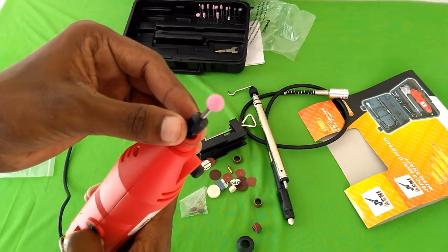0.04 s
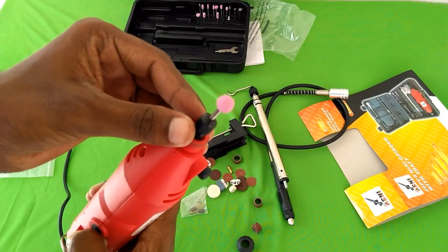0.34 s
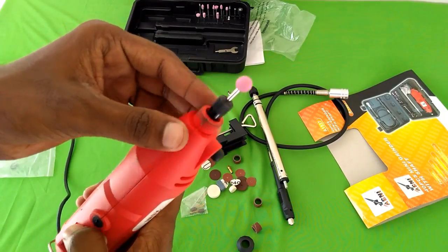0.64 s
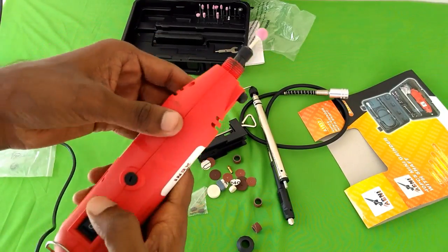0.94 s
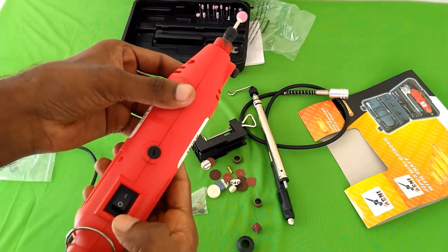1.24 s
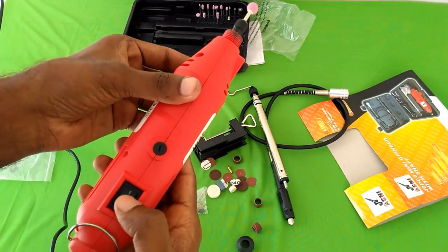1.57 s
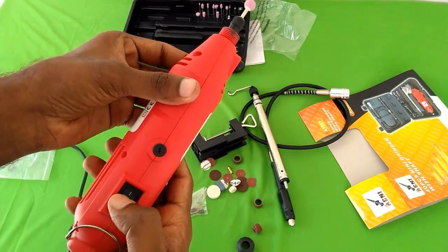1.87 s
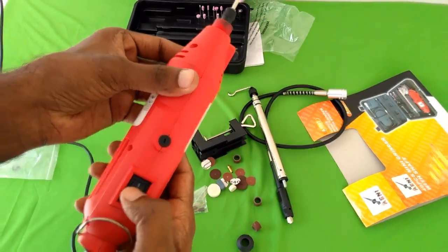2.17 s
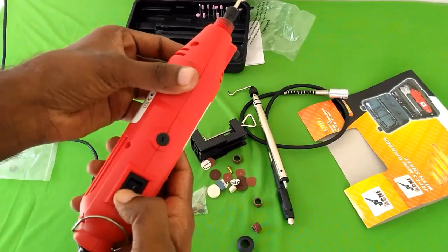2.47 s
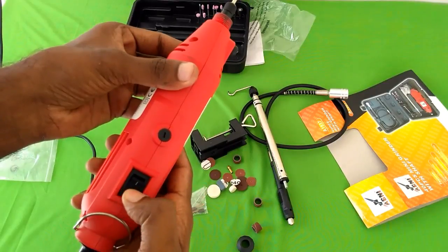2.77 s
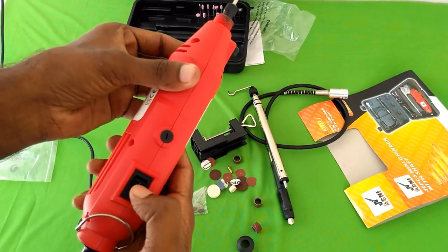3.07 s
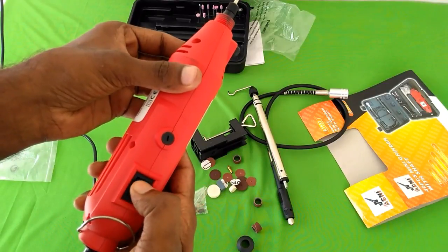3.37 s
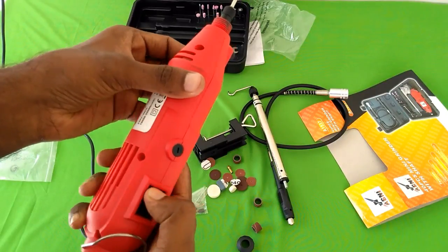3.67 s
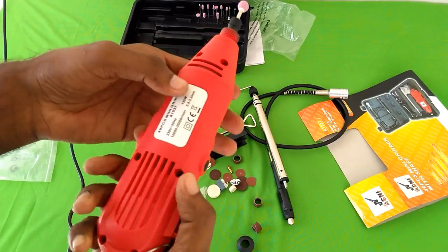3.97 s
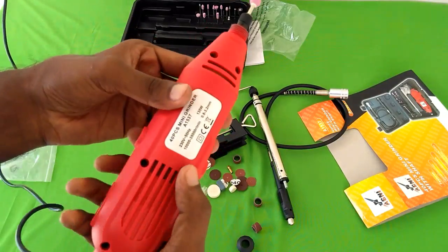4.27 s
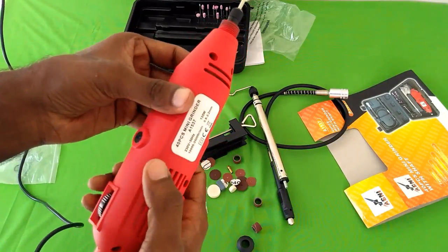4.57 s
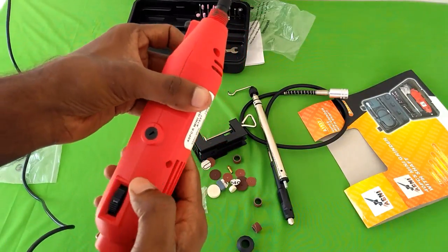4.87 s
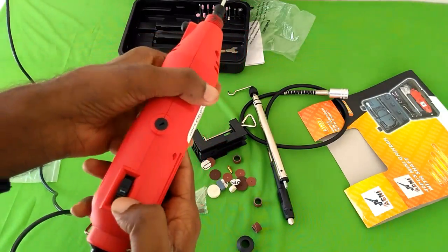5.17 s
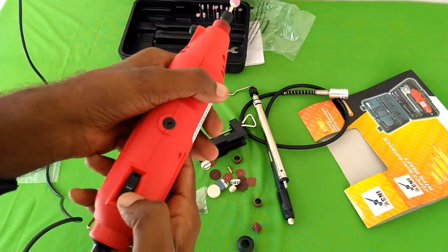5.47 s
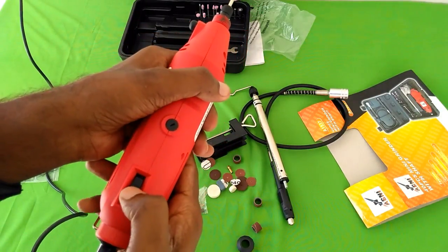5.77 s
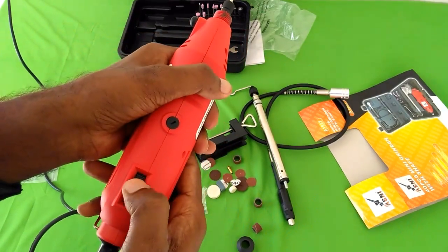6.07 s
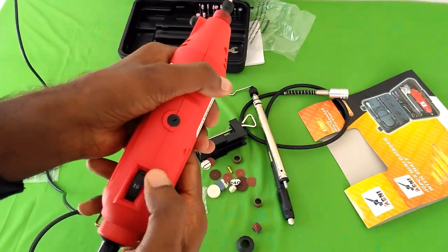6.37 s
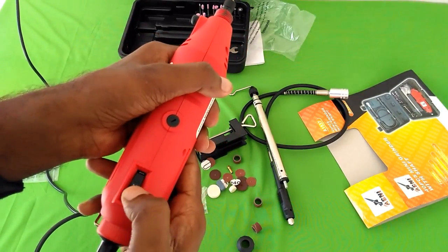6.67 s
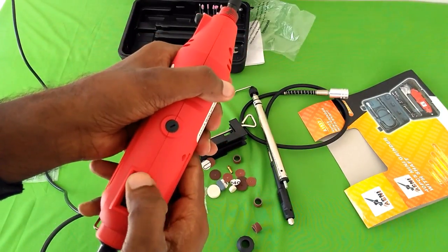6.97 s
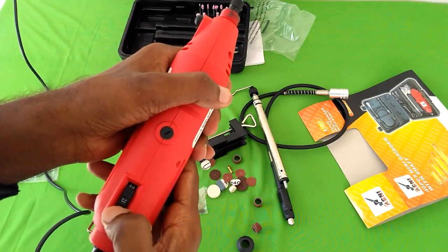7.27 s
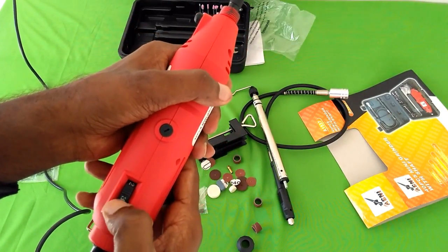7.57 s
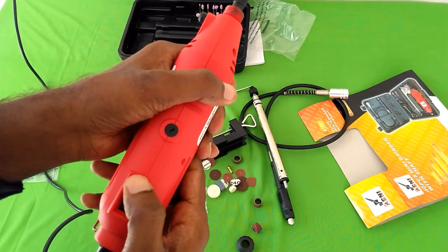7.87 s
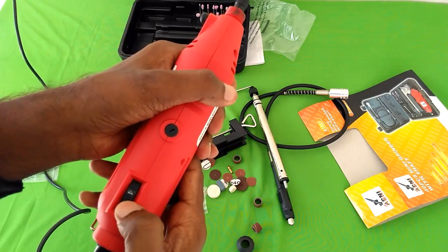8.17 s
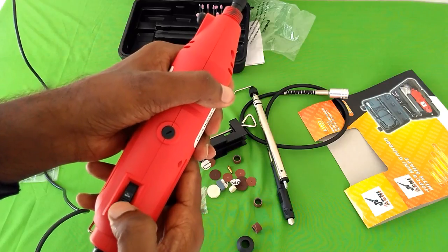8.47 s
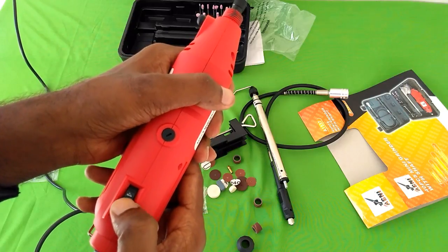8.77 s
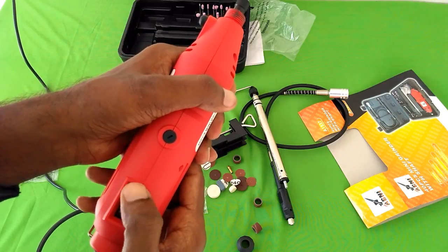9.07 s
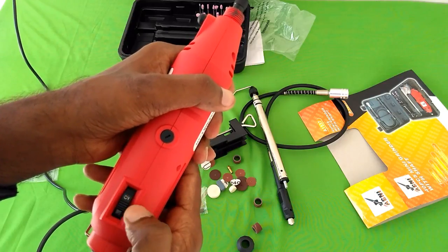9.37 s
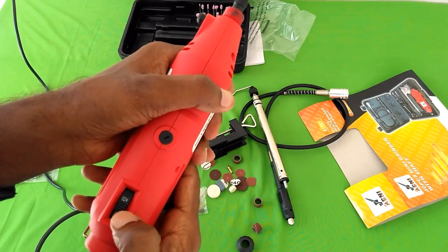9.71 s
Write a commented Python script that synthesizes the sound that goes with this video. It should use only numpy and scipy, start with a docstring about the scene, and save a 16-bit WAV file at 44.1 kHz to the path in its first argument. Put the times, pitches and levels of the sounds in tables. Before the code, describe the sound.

Running freely indoors, a handheld electric grinder buzzes, is switched off briefly, then starts again and speeds up to a shrill whine.

```python
"""A small mains rotary grinder runs unloaded in the hand, near a two-port microphone in a room.
The rotor sings on its orders, chopped mains makes the slots buzz, brushes rub and hiss, the fan rushes.
At 2.4 s the rocker snaps off and the rotor coasts to rest, rattling faintly.
At 3.5 s a thumb squeaks on the rocker and the motor restarts; at 4.1 s the grip changes.
From 6.2 s the dial is turned up in steps, to over 400 turns per second (rps)."""
import sys
import numpy as np
from scipy import signal
from scipy.fft import rfft, irfft, next_fast_len
from scipy.io import wavfile
from scipy.ndimage import uniform_filter1d

SR = 44100
rng = np.random.default_rng(int(sys.argv[2]) if len(sys.argv) > 2 else 0)


def materialize(psi):
    """Save the field psi as 16-bit PCM at rate SR to the path in sys.argv[1].

    A 1-D psi becomes a single channel; in a 2-D psi each row is a channel.
    """
    bounded = np.clip(np.atleast_2d(psi).T, -1, 1)
    quanta = np.round(bounded * 32767).astype(np.int16)
    wavfile.write(sys.argv[1], SR, quanta)


N = 429534
TIME = np.arange(N) / SR
FFT_SIZE = next_fast_len(N + SR // 2)
BINS_HZ = np.maximum(np.fft.rfftfreq(FFT_SIZE, 1 / SR), 1)

OFF_S, ON_S = 2.415, 3.469
POWERED = (np.arange(N) < OFF_S * SR) | (np.arange(N) >= ON_S * SR)
HALF_WAVE_HZ = 99.96
MAINS_RIPPLE = np.cos(2 * np.pi * HALF_WAVE_HZ * (TIME - .0013))
SLOW_RPS, IDLE_RPS, FRICTION_FADE_RPS = 60, 160, 63
FACING_SHARE = .061  # part of the stator's facing level that rotor tones and growl follow

# Sides shown as the tool turns in the hand: t/s, rub/dB, hiss/dB, stator/dB
FACING = [(0, -1.5, 0.5, 6), (.6, -1.5, -2.5, 3), (.93, -7, -3, -23), (1.2, -1.5, -6, 6.5),
          (1.8, -2, -5, 8.5), (2.3, -3.5, -9.5, 8), (3.6, 8.5, 2, 8.5), (4.3, -1.5, 1.5, 8.5),
          (4.6, 0.5, 2, -5), (5.3, -7, 2.5, 8), (6.1, -4.5, 0, 10), (6.4, -4.5, -6, 12),
          (6.9, -3.5, -3.5, 13.5), (7.4, 0, -3, 11), (8.1, -2, -6.5, 2), (8.9, 2.5, -2, 1),
          (9.7, 5.5, -1, 9.5)]
# Brush rub spectrum: f/Hz, density/dB
RUB_SPECTRUM = [(1500, -2.5), (1680, -9), (1880, 9), (2200, -21), (2500, 9.5), (2900, 14), (3300, 4),
                (3950, 9.5), (4700, 7), (5600, 5.5), (6500, 3), (8000, -40)]
# Brush hiss spectrum: f/Hz, density/dB
HISS_SPECTRUM = [(5500, -16), (6800, -0.5), (7500, -0.5), (8600, 1.5), (10000, -0.5), (11800, -1),
                 (13200, -3), (14800, -5), (16000, -41)]


def rotor(rps, turns):
    """Imbalance (order 1), ball bearing (5.19) and slot (8) tones; they drop without current."""
    # Shaft speed steps: speed/rps
    steps_rps = [60, 160, 198, 255, 355, 420]
    # Rotor tones: order/(cycles per turn)
    orders = [1, 2, 3, 4, 5.19, 6, 8, 10, 11, 12]
    # Rotor tones, a row per order: level/dB at each speed step
    levels_db = [(-92.5, -64, -58, -49.5, -42, -34), (-102, -65, -54, -45.5, -47, -47),
                 (-73, -62.5, -54.5, -58, -45.5, -31.5), (-101, -61, -49.5, -50, -43, -34),
                 (-101, -48.5, -48.5, -40.5, -55, -42), (-99, -59, -34.5, -35.5, -28.5, -30),
                 (-100, -42, -44.5, -35, -50, -27.5), (-96.5, -53.5, -36.5, -33.5, -47, -45),
                 (-99, -54.5, -38, -54, -65, -43), (-99, -62.5, -48.5, -53, -67, -60)]
    _, _, stator_db = time_curves(FACING)
    drive = np.minimum(rps / SLOW_RPS, 1) ** 2 * from_db(np.where(POWERED, FACING_SHARE * stator_db, -26.5))
    gains = (from_db(np.interp(rps, steps_rps, row)) for row in levels_db)
    return drive * sum(g * tone(turns, k, waver_db=3.5, waver_hz=11) for k, g in zip(orders, gains))


def commutator(rps, turns, whine):
    """Uneven bars knock the brushes alike each turn: high orders, coloured by grip, speed and housing."""
    # Bar tones: order/(cycles per turn), first grip/dB, second grip/dB, high speed/dB
    bar_tones = [(14, -46, -40, -55), (16, -50, -38, -49), (17, -52.5, -55, -43), (18, -60.5, -56, -51),
                 (19, -42.5, -42.5, -56), (21, -53, -48, -39), (22, -46.5, -46, -41), (23, -65.5, -63, -54),
                 (24, -43.5, -53, -46), (25, -43, -60, -41), (26, -43.5, -43.5, -45), (27, -55, -53, -41),
                 (28, -42, -47, -43), (29, -46, -64, -44), (30, -51, -53, -50), (31, -42, -41, -49),
                 (32, -38, -47, -40), (33, -37, -41, -47), (34, -33, -40, -37), (35, -41, -51, -44),
                 (36, -39, -55, -53), (38, -49, -56, -51), (40, -53, -65, -50), (43, -57, -50, -54),
                 (45, -48, -42, -47), (47, -48.5, -45, -53)]
    # Housing radiation: f/Hz, gain/dB
    radiation = [(1000, -13), (2400, -18.5), (3300, 1.5), (4000, 1), (4700, -3), (5400, -3.5), (6300, 1),
                 (7200, -2), (8200, -5.5), (8950, 2.5), (9600, 7.5), (10150, 6.5), (10800, -5), (11450, 10),
                 (12200, -3), (14000, -17)]
    grip, fast = second_grip(), np.interp(rps, [195, 250], [0, 1])
    shares = np.float32([(1 - grip) * (1 - fast), grip * (1 - fast), fast])
    comb = sum((np.float32(from_db(levels_db)) @ shares) * tone(turns, k, waver_db=3.8, waver_hz=24)
               for k, *levels_db in bar_tones)
    mid, side = filtered(whine * np.array([comb.real, comb.imag]), gain_curves(radiation)[0])
    return mid + 1j * side


def slot_buzz(rps, turns):
    """Current pulses jerk the rotor and pull on its slots, ringing the stator and rattling the shell."""
    # Magnetic pull: order/(cycles per turn), level/dB
    pull_orders = [(8, -14), (10, -40), (12, -51.5), (13, -49.5), (14, -44), (16, -28.5), (24, -33),
                   (32, -33)]
    # Stator modes: f/Hz, Q, gain/dB
    stator_modes = [(2644, 5.45, -4), (3402, 11, -15), (3863, 6.7, -1.5)]
    _, _, stator_db = time_curves(FACING)
    current = mains_pulses(rps, sharpness=1.15) * from_db(2 * drift(130))
    jerk = np.exp(1.3j * MAINS_RIPPLE)  # phase swing spreads each order into a cluster
    slots = sum(from_db(db) * tone(turns, k, waver_db=1.3, waver_hz=25) for k, db in pull_orders)
    pull = speed_gain(rps, -2, knee_rps=147, db_per_oct=(15, -.5), off_db=-64) * current * jerk * slots
    knocks = rng.standard_normal((2, N)) + from_db(-8) * surge(rps) * worn_surface(turns, facets=40)
    rattle_gain = speed_gain(rps, -30.5, knee_rps=106, db_per_oct=(8.5, -.5), off_db=-40)
    rattle = rattle_gain * current * (knocks[0] + 1j * knocks[1])
    growl = from_db(FACING_SHARE * stator_db) * resonance(from_db(-31) * pull + rattle, hz=708, q=4.9)
    low, middle, high = (from_db(db) * resonance(pull, hz, q) for hz, q, db in stator_modes)
    return from_db(4.5 * surge(rps)) * (from_db(stator_db) * low - middle + high) + growl


def brushes_and_fan(rps, turns):
    """Air rushes through the vents; the brushes sputter and scrape harder once a turn."""
    # Vent air spectrum: f/Hz, density/dB
    air_spectrum = [(200, -29.5), (330, -14.5), (450, -15), (560, -8.5), (660, -3.5), (780, -7), (950, -7),
                    (1150, 0), (1300, 8), (1600, -0.5), (2000, 4.5), (2350, 0.5), (2900, -16)]
    # Brief swells of the rush: t/s, half-width/s, level/dB
    swells = [(0.732, 0.036, 5.5), (5.122, 0.056, 1.5), (6.66, 0.28, 3.5), (7.21, 0.23, 4),
              (7.793, 0.14, 5.5), (8.89, 0.057, 1.5)]
    rub_db, hiss_db, _ = time_curves(FACING)
    scrape = np.cos(2 * np.pi * turns)
    air = speed_gain(rps, -38, knee_rps=161, db_per_oct=(29.5, 8), off_db=-19)
    air = air * from_db(2 * drift(25)) * noise(air_spectrum) * mains_pulses(rps, sharpness=.053)
    rub = speed_gain(rps, -30.5, knee_rps=169.5, db_per_oct=(21.5, -5), off_db=-46)
    rub += from_db(-49) * np.tanh(rps / FRICTION_FADE_RPS)  # friction that needs no current
    rub = rub * from_db(rub_db + .35 * scrape + 1.6 * drift(22) + 1.3 * drift(190)) * noise(RUB_SPECTRUM)
    hiss = speed_gain(rps, -33.5, knee_rps=150.5, db_per_oct=(12.5, 2.4), off_db=-15)
    hiss = hiss * from_db(hiss_db + .48 * scrape + drift(19) + .53 * drift(190)) * noise(HISS_SPECTRUM)
    swell_db = sum(db * bump(at_s, width_s) for at_s, width_s, db in swells)
    return from_db(swell_db - 2 * surge(rps)) * (air + rub + hiss)


def brush_whirr(rps, turns, order=33.5, width_hz=420):
    """Uneven brush chatter: a narrow noise band that follows the shaft, whistling as it coasts."""
    chatter = filtered(rng.standard_normal((2, N)), 1 / (1 + (2 * BINS_HZ / width_hz) ** 4))
    band = (chatter[0] + 1j * chatter[1]) / chatter.std() * np.exp(2j * np.pi * order * turns)
    driven = speed_gain(rps, -38, knee_rps=116, db_per_oct=(50, -20), off_db=-40)
    driven *= from_db(-3 * second_grip()) * mains_pulses(rps, sharpness=.33)
    radiated = 1 / (1 + (2200 / (order * rps + 1)) ** 4)  # fades below 2200 Hz
    return band * (driven + ~POWERED * from_db(-49) * radiated)


def bar_rasp(turns, whine):
    """The worn commutator scrapes past the brushes with the same fine pattern each turn."""
    colour = gain_curves(RUB_SPECTRUM)[0] + from_db(-15) * gain_curves(HISS_SPECTRUM)[0]
    low_cut = np.minimum(BINS_HZ / RUB_SPECTRUM[0][0], 1) ** 4
    rasp = filtered(worn_surface(turns, facets=160), colour * low_cut)
    return whine * from_db(-38.5) * rasp / rasp.std()


def rocker_switch(crack_t60_s=.029):
    """The rocker snaps over with a short crack that rings the housing."""
    # Rocker snaps: t/s, level/dB, low-mode gain/dB
    snaps = [(2.4106, -15, 7), (2.424, -32, -5.5), (2.4323, -38, -12), (3.4712, -23, -18)]
    # Housing modes: f/Hz, level/dB, t60/s
    housing_modes = [(480, -18, 0.0108), (1000, -5.5, 0.0044), (2780, -18, .014), (3070, -2.5, 0.014),
                     (4070, -1.5, 0.022), (5480, 3.5, 0.0072), (6870, -7.5, 0.027), (8120, -1.5, 0.022),
                     (9640, -8, 0.007), (12170, -3, 0.0078)]
    out, t = np.zeros((2, N)), np.arange(SR // 10) / SR
    for at_s, db, low_db in snaps:
        snap = from_db(-6.5 - 60 * t / crack_t60_s) * rng.standard_normal((2, len(t)))
        for hz, mode_db, t60_s in housing_modes:
            decay = from_db(mode_db + low_db * (hz < 1500) - 60 * t / t60_s)
            snap += decay * np.sin(2 * np.pi * hz * t) * rng.choice([-1, 1], (2, 1))
        start = round(at_s * SR)
        out[:, start:start + len(t)] += from_db(db) * snap
    return out


def coast_rattle(rps, turns):
    """The coasting rotor shakes in its bearings; shell modes ring as falling orders glide through."""
    # Coasting tones: order/(cycles per turn)
    orders = [3, 5, 8, 10, 12, 32]
    # Shell modes: f/Hz, Q, gain/dB
    shell_modes = [(342, 12, -62.5), (740, 23, -62), (925, 24, -71), (1320, 16, -69.5), (1870, 9, -70)]
    tones = sum(tone(turns, k, waver_db=2.5, waver_hz=13) for k in orders)
    knocks = from_db(8.5 + 2.5 * (drift(25) + np.cos(2 * np.pi * turns))) * rng.standard_normal((2, N))
    shake = (np.array([tones.real, tones.imag]) + knocks) * ~POWERED * np.tanh(rps / FRICTION_FADE_RPS)
    return sum(from_db(db) * resonance(shake, hz, q) for hz, q, db in shell_modes)


def thumb_squeak(at_s=3.38, half_width_s=.14):
    """The thumb slips on the plastic rocker with a short, thin ring."""
    # Squeak modes: f/Hz, Q, level/dB
    modes = [(1040, 29, -70), (1560, 50, -74)]
    rings = [(db, resonance(rng.standard_normal((2, N)), hz, q)) for hz, q, db in modes]
    envelope = np.exp(-((TIME - at_s) / half_width_s) ** 4)
    return envelope * sum(from_db(db) * ring / ring.std() for db, ring in rings)


def hand(rps):
    """The held housing rumbles; shifting fingers rub on it."""
    # Finger shifts: t/s, half-width/s, level/dB
    shifts = [(0.778, 0.17, -61), (1.75, 0.12, -57), (3.39, 0.094, -66), (4.5, 0.28, -52.5)]
    # Skin rub spectrum: f/Hz, density/dB
    skin_spectrum = [(100, -1.5), (160, 0.5), (220, 4.5), (290, -4), (400, 1), (520, -11), (750, -5)]
    # Housing rumble spectrum: f/Hz, density/dB
    rumble_spectrum = [(20, -23.5), (35, -21), (60, 4.5), (120, 2), (200, 1.5), (300, -3), (600, -5.5)]
    rumble = speed_gain(rps, -53, knee_rps=218, db_per_oct=(3, -13), off_db=-36.5)
    rumble = rumble * from_db(3 * second_grip() + .66 * drift(14)) * noise(rumble_spectrum)
    slip = sum(from_db(db) * bump(at_s, width_s) for at_s, width_s, db in shifts)
    return rumble + slip * from_db(3 * drift(32)) * noise(skin_spectrum)


def room_tone():
    """Steady, faint background noise."""
    # Room noise spectrum: f/Hz, density/dB
    spectrum = [(25, -2), (100, -5.5), (220, -8), (450, -20.5), (1100, -20.5), (2500, -10.5), (3000, -19.5),
                (6000, -29.5), (15000, -31)]
    return from_db(-63) * noise(spectrum)


def room(x, t60_s=.2, first_echo_s=.004, tail_db=-18):
    """Adds a short diffuse tail after the first wall echo."""
    t = np.arange(SR // 3) / SR
    tail = rng.standard_normal((2, len(t))) * from_db(-60 * t / t60_s) * (t > first_echo_s)
    tail /= np.sqrt(np.sum(tail ** 2, axis=1, keepdims=True))
    return x + from_db(tail_db) * filtered(x, rfft(tail, FFT_SIZE))


def port_pair(mid_side):
    """Each port subtracts a delayed copy of the other, notching mid and side; returns left, right."""
    # Port response: f/Hz, side over mid/dB, cross-feed/dB, left over right/dB
    response = [(60, -0.5, -4, -3), (319, -9.5, -1.5, 2), (725, -4.5, -16.5, 2.5), (1290, -2.5, 7, -1),
                (1550, 4.5, 23, -7.5), (2280, 5, 47.5, 1), (3500, 3, -5, -2.5), (5210, -1.5, -6, 1),
                (7500, -1, -3.5, -2.5), (9700, -1, -20.5, -1), (13000, 1, -3, -1.5)]
    # Port cancellations: f/Hz
    nulls_hz = [0, 2380, 4950, 7450, 10550, 13000, 15800]
    width, feed, balance = gain_curves(response)
    delay_cycles = np.interp(BINS_HZ, nulls_hz, np.arange(len(nulls_hz)))
    feed = np.minimum(feed, .97) * np.exp(-2j * np.pi * delay_cycles)
    gains = np.array([np.abs(1 - feed), width * np.abs(1 + feed)])
    mid, side = rfft(mid_side, FFT_SIZE) * gains / np.hypot(*gains)
    pair = np.array([(mid + side) * balance, mid - side]) * np.sqrt(2 / (1 + balance ** 2))
    return irfft(pair, FFT_SIZE)[:, :N]


def shaft_rps(initial_rps=154.5, coast_s=.87):
    """Rotor energy settles towards each dial setting; unpowered, friction brings it to rest."""
    # Dial settings: t/s, target speed/rps, time constant/s
    dial = [(.834, 160.5, .305), (3.469, 182.7, .935), (5.788, 172.7, .098), (6.231, 200.6, .19),
            (6.887, 268.5, .366), (7.786, 367.1, .321), (8.871, 431.4, .326)]
    energy = np.full(N, initial_rps ** 2)
    for at_s, target_rps, lag_s in dial:
        start = round(at_s * SR)
        held = 0 if at_s == ON_S else energy[start]
        energy[start:] = target_rps ** 2 + (held - target_rps ** 2) * np.exp(-TIME[:N - start] / lag_s)
    coast = np.clip(1 - (TIME - OFF_S) / coast_s, 0, 1) ** 1.33
    return np.sqrt(np.maximum(energy, 0)) * np.where(POWERED, 1, coast)


def mains_pulses(rps, sharpness):
    """Current flows once a half wave, in wider pulses as the dial raises the speed; rms 1."""
    narrowness = POWERED * sharpness * (IDLE_RPS / np.maximum(rps, IDLE_RPS)) ** .6
    pulses = np.exp(narrowness * (MAINS_RIPPLE - 1))
    return pulses / np.sqrt(uniform_filter1d(pulses ** 2, size=1323))  # 30 ms


def surge(rps, full_rps_per_s=290):
    """Extra current drawn while the shaft gains speed, 0-1."""
    return uniform_filter1d(np.clip(np.gradient(rps) * SR / full_rps_per_s, 0, 1), size=SR // 10)


def second_grip(at_s=4.08, takes_s=.11):
    """Ramps 0 to 1 as the hand changes grip."""
    return np.clip((TIME - at_s) / takes_s + .5, 0, 1)


def speed_gain(rps, knee_db, knee_rps, db_per_oct, off_db):
    """Gain against speed, sloped (below, above) a knee; off_db is added without power."""
    octaves = np.log2(np.maximum(rps, 1) / knee_rps)
    return from_db(knee_db + octaves * np.where(octaves < 0, *db_per_oct) + off_db * ~POWERED)


def worn_surface(turns, facets):
    """A rough ring passes a contact: one pattern repeats each turn, mid and side."""
    return rng.standard_normal((2, facets))[:, (turns * facets).astype(int) % facets]


def tone(turns, order, waver_db, waver_hz):
    """One shaft order, wavering in level and phase, as mid + 1j * side."""
    cycles = order * turns + rng.random()
    waver = waver_db * np.log(10) / 20 * drift(waver_hz)
    phase_rad = 2 * np.pi * cycles + waver[::-1]
    return np.sqrt(2) * np.exp(waver + 1j * phase_rad)


def resonance(x, hz, q):
    """A steep resonance: two equal peak filters in series."""
    b, a = signal.iirpeak(hz, q, fs=SR)
    return signal.lfilter(b, a, signal.lfilter(b, a, x + 1e-18))


def noise(spectrum):
    """Mid and side noise, falling away beyond the spectrum's ends; rms 1."""
    skirts = np.minimum(BINS_HZ / spectrum[0][0], 1) ** 2 * np.minimum(spectrum[-1][0] / BINS_HZ, 1) ** 2
    x = filtered(rng.standard_normal((2, N)), gain_curves(spectrum)[0] * skirts)
    return x / x.std()


def drift(rate_hz):
    """Random wander with a spread of about 1."""
    return np.interp(TIME * rate_hz, np.arange(2000), rng.standard_normal(2000))


def bump(at_s, half_width_s):
    """Gaussian envelope, peak 1."""
    return np.exp(-((TIME - at_s) / half_width_s) ** 2)


def filtered(x, response):
    """Applies a frequency response."""
    return irfft(rfft(x, FFT_SIZE) * response, FFT_SIZE)[..., :N]


def time_curves(rows):
    """Each column after t/s, at every sample."""
    times_s, *columns = np.transpose(rows)
    return [np.interp(TIME, times_s, column) for column in columns]


def gain_curves(rows):
    """Each dB column after f/Hz, as a gain at every bin."""
    hz, *columns = np.transpose(rows)
    return [from_db(np.interp(np.log(BINS_HZ), np.log(hz), column)) for column in columns]


def from_db(db):
    """Decibels to gain."""
    return 10 ** (np.asarray(db) / 20)


def scene():
    """One slightly unsteady shaft speed drives the motor's sounds."""
    rps = shaft_rps()
    jitter = .0022 * IDLE_RPS / np.maximum(rps, SLOW_RPS) * drift(90)
    turns = np.cumsum(rps * (1 + jitter)) / SR
    whine = speed_gain(rps, 1.5, knee_rps=150.5, db_per_oct=(34.5, -11), off_db=-32)
    whine *= from_db(2.5 * surge(rps) - second_grip()) * mains_pulses(rps, sharpness=.033)
    tones = rotor(rps, turns) + commutator(rps, turns, whine)
    tones += slot_buzz(rps, turns) + brush_whirr(rps, turns)
    tool = np.array([tones.real, tones.imag]) + bar_rasp(turns, whine) + brushes_and_fan(rps, turns)
    tool += coast_rattle(rps, turns) + thumb_squeak() + rocker_switch()
    return port_pair(room(tool) + hand(rps) + room_tone())


def record(dry):
    """Steep low-pass at 15.4 kHz."""
    return signal.sosfilt(signal.ellip(12, .1, 80, 15400, fs=SR, output="sos"), dry)


dry = scene()
out = record(dry)
materialize(out)
```